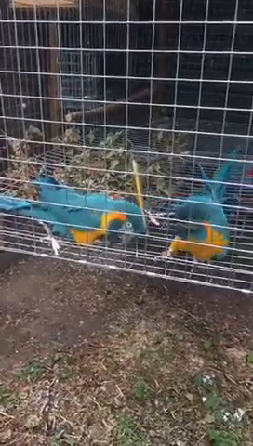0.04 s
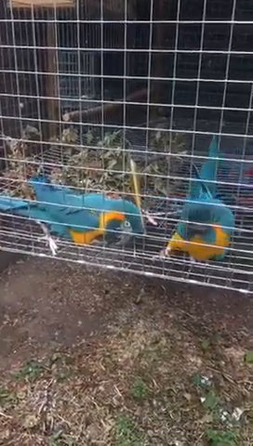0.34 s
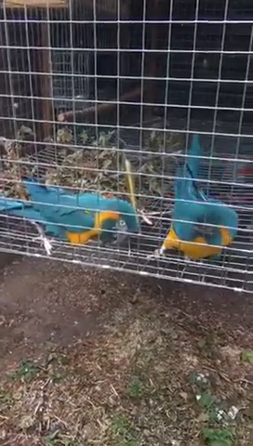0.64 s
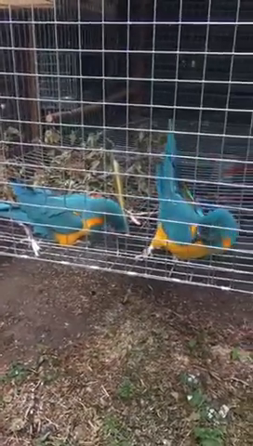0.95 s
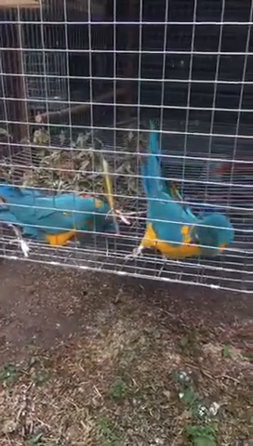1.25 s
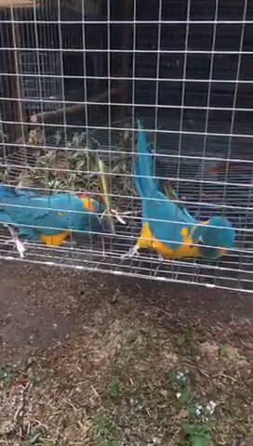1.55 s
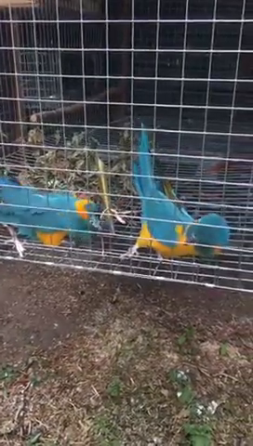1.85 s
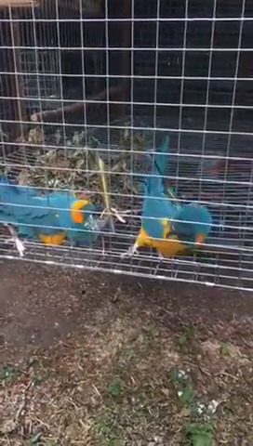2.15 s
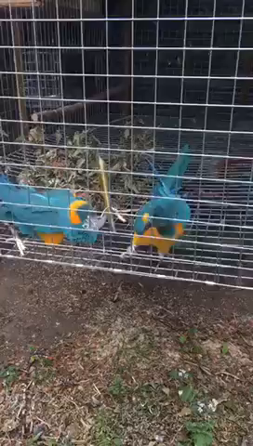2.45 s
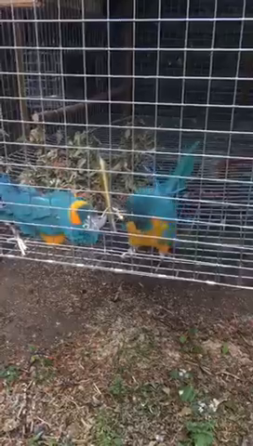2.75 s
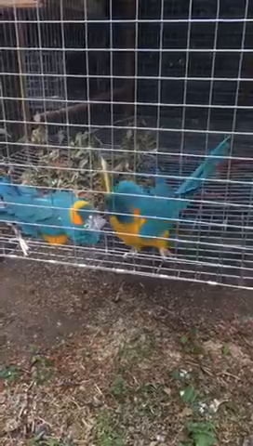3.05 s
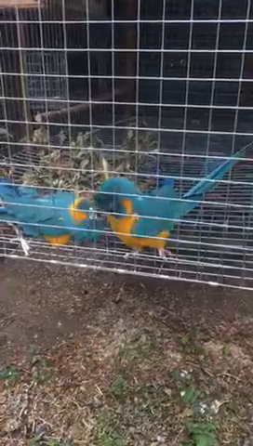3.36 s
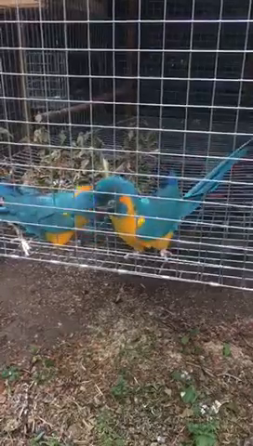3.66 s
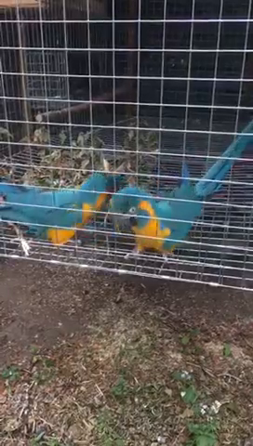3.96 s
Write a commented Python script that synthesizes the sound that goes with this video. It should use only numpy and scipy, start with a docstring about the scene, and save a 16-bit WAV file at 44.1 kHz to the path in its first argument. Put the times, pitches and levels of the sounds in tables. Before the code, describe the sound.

A macaw gives one raspy squawk over steady outdoor hiss and low rumble.

```python
"""A macaw in an outdoor wire cage gives a short low croak, then one raspy squawk that swells and sags.
Its voice is a train of uneven pulses and turbulent air, shaped by the throat and answered by the aviary.
The wire ticks once, feathers brush the mesh and the microphone takes a few soft bumps.
Behind it all sits a bed of steady hiss and low rumble, with a distant bird whistling near the end."""
import sys
import numpy as np
from scipy import signal
from scipy.fft import rfft, irfft, next_fast_len
from scipy.io import wavfile
from scipy.ndimage import map_coordinates

SR = 44100
rng = np.random.default_rng(int(sys.argv[2]) if len(sys.argv) > 2 else 0)


def materialize(psi):
    """Save the field psi as 16-bit PCM at rate SR to the path in sys.argv[1].

    A 1-D psi becomes a single channel; in a 2-D psi each row is a channel.
    """
    bounded = np.clip(np.atleast_2d(psi).T, -1, 1)
    quanta = np.round(bounded * 32767).astype(np.int16)
    wavfile.write(sys.argv[1], SR, quanta)


N = 176400

# EQ of the outdoor hiss and of the air rumble: f/Hz, gain/dB
HISS_EQ = [(120, -31), (200, -1.5), (225, -4), (303, 0), (357, -2.5), (429, -3), (550, -9.5), (660, -15.5),
           (982, -7.5), (1070, -8), (1460, -8), (1670, -10.5), (2250, -11), (4220, -7.5), (4900, -9),
           (6080, -1), (7660, -10.5), (9510, -15.5), (10500, -23), (13600, -46), (22000, -120)]
RUMBLE_EQ = [(10, -22), (22, -3.5), (45, -0.5), (70, -7.5), (100, -16.5), (160, -28), (250, -42),
             (500, -76.5)]
# their fader rides: t/s, level/dB
HISS_RIDE = [(0, -49), (1, -48.5), (2, -47.5), (3, -46), (3.5, -46), (4, -46)]
RUMBLE_RIDE = [(0, -29.5), (.6, -33), (1.2, -34.5), (2, -34.5), (2.8, -35), (3.3, -34.5), (4, -35.5)]
# distant bird, one table per note: t/s, f/Hz, level/dB
WHISTLE_NOTES = [
    [(3.42, 2400, -68), (3.45, 2180, -57), (3.5, 1900, -60), (3.55, 1970, -52), (3.6, 2010, -54),
     (3.675, 1985, -52), (3.69, 1950, -72)],
    [(3.74, 2380, -68), (3.785, 2320, -54), (3.818, 2240, -45), (3.855, 2150, -54), (3.89, 2170, -66)],
    [(3.89, 1560, -66), (3.925, 1600, -56), (3.955, 1650, -53), (3.98, 1650, -68)],
]
# reverb time of the woods and of the aviary: f/Hz, t60/s
WOODS_DECAY = [(200, .2), (2500, 0.26), (10000, 0.11)]
AVIARY_DECAY = [(200, 0.41), (2500, 0.31), (10000, 0.099)]
# microphone bumps: t/s, level/dB, starting f/Hz, t60/s
MIC_BUMPS = [(.055, -32.5, 198, 0.15), (1.371, -20.5, 143, 0.59), (1.492, -22.5, 280, 0.033),
             (1.5, -16, 72.5, 0.086), (2.901, -21.5, 54, 0.3), (3.66, -16, 63, 0.12)]
# tick on the wire and swell of the feather rustle: t/s, level/dB
WIRE_TICKS = [(1.186, -29)]
RUSTLE_RIDE = [(1.18, -61), (1.21, -50.5), (1.255, -52), (1.31, -64)]
# their bright EQs: f/Hz, gain/dB
TICK_EQ = [(1000, -20), (4500, -14), (6000, 0), (7500, -7), (10500, -8)]
RUSTLE_EQ = [(2000, -15), (5000, -8), (6500, 2), (8500, -7), (10500, -4.5)]
# vocal effort of the croak and of the squawk: t/s, level/dB
CROAK_EFFORT = [(.94, -61), (.985, -47), (1.025, -46.5), (1.06, -73)]
SQUAWK_EFFORT = [(2.22, -66), (2.3, -49), (2.37, -41.5), (2.41, -40), (2.45, -34), (2.52, -30.5),
                 (2.585, -30), (2.635, -34.5), (2.7, -41), (2.735, -55.5), (2.78, -62)]
# pitch arc of the squawk: t/s, f/Hz
SQUAWK_PITCH = [(2.25, 368), (2.34, 376), (2.38, 390), (2.42, 436), (2.465, 422), (2.51, 425), (2.538, 441),
                (2.572, 423), (2.6, 398), (2.635, 376), (2.76, 362)]
# rasp of the squawk: t/s, share of turbulent air/0-1
SQUAWK_RASP = [(2.3, .35), (2.435, .55), (2.49, .16), (2.56, .14), (2.61, .42), (2.72, .42)]
# tone of the croak, the breath, the nearly shut beak and the open beak: f/Hz, gain/dB
CROAK_EQ = [(300, -22), (600, -13), (850, -1), (1150, -0.5), (1600, -1), (2200, -12), (2900, -12),
            (3200, 7), (3450, -7), (4000, 2.5), (4500, -5), (5500, -4), (7000, -20), (10000, -36)]
BREATH_EQ = [(400, -13), (1200, -1), (2400, -1), (7000, -0.5)]
BEAK_SHUT_EQ = [(300, -26), (700, -20), (1000, -3), (1180, -0.5), (1600, -14), (2200, -4), (2550, -2.5),
                (3200, -20), (3700, 0), (4300, 3), (5100, -7), (5900, 4.5), (7200, -8), (10000, -20.5)]
BEAK_OPEN_EQ = [(200, -22.5), (420, -13), (630, -24), (860, -14), (1250, -15.5), (1850, -18), (2120, -7.5),
                (3400, -4.5), (3900, -7.5), (5100, -7.5), (6400, -2.5), (7100, -10.5), (7900, -11),
                (8600, -20.5), (9600, -15.5), (11000, -46.5)]
# resonances of the open throat: f/Hz, width/Hz, boost/dB
THROAT_FORMANTS = [(1270, 170, 6), (2550, 270, 11), (3230, 360, 8), (4500, 380, 10), (5980, 380, 8)]


def amp(db):
    """Decibels to gain."""
    return 10 ** (np.asarray(db) / 20)


def unit(x):
    """Normalise to rms 1."""
    return x / np.sqrt(np.mean(x ** 2) + 1e-20)


def along(points, hz):
    """Read (f/Hz, value) points on a log frequency axis."""
    f, values = np.transpose(points)
    return np.interp(np.log(hz + 1), np.log(f + 1), values)


def curve(rows, column=1):
    """One column of a time table as an automation lane."""
    rows = np.array(rows)
    return np.interp(np.arange(N) / SR, rows[:, 0], rows[:, column])


def envelope(rows, column=1):
    """Gain from a dB column, muted outside its span."""
    t = np.arange(N) / SR
    return amp(curve(rows, column)) * (t > rows[0][0]) * (t < rows[-1][0])


def wobble(rate):
    """A smooth random LFO, rate points a second."""
    points = rng.standard_normal(int(N * rate / SR) + 4)
    return map_coordinates(points, [np.arange(N) * rate / SR])


def filtered(x, response):
    """Zero-phase filter; response gives the gain at each frequency."""
    size = next_fast_len(N + SR // 2)
    return irfft(rfft(x, size) * response(np.fft.rfftfreq(size, 1 / SR)), size)[:N]


def eq(x, points, peaks=(), size=4096):
    """Minimum-phase EQ: a drawn curve with resonant peaks on top."""
    f = np.fft.rfftfreq(size, 1 / SR)
    peaks_db = sum(boost / (1 + (2 * (f - hz) / width) ** 2) for hz, width, boost in peaks)
    cepstrum = irfft(np.log(amp(along(points, f) + peaks_db)))
    cepstrum[1:size // 2] *= 2  # folded so nothing rings ahead of a transient
    cepstrum[size // 2 + 1:] = 0
    return signal.fftconvolve(x, irfft(np.exp(rfft(cepstrum))))[:N]


def reverb(x, decay):
    """A diffuse tail in which each frequency dies at its own speed."""
    hz, t, noise = signal.stft(rng.standard_normal(SR // 2), SR, nperseg=256)
    fall_db = -60 * t / along(decay, hz)[:, None]
    tail = signal.istft(noise * amp(fall_db), SR, nperseg=256)[1]
    return signal.fftconvolve(x, tail / np.linalg.norm(tail))[:N]


def outdoor_bed(lumps_db=1.5, drift_db=.53):
    """Steady outdoor hiss over a lumpy rumble of air on the microphone."""
    hiss = unit(filtered(rng.standard_normal(N), lambda hz: amp(along(HISS_EQ, hz))))
    rumble = filtered(rng.standard_normal(N), lambda hz: amp(along(RUMBLE_EQ, hz)))
    rumble = unit(rumble * amp(lumps_db * wobble(6.996)))
    return hiss * amp(curve(HISS_RIDE) + drift_db * wobble(8)) + rumble * amp(curve(RUMBLE_RIDE))


def distant_bird(waver=.016, wet_db=-4):
    """Three wavering whistles, blurred by the woods."""
    song = np.zeros(N)
    for note in WHISTLE_NOTES:
        pitch = curve(note) * (1 + waver * wobble(150))
        song += envelope(note, column=2) * np.sin(2 * np.pi * np.cumsum(pitch) / SR)
    return song + amp(wet_db) * reverb(song, WOODS_DECAY)


def mic_bumps(rest_hz=45.4, sag_s=.014, attack_s=.0043):
    """Soft thumps on the microphone, each a sine diving in pitch."""
    thumps = np.zeros(N)
    for start, db, hz, t60 in MIC_BUMPS:
        t = np.arange(N - round(start * SR)) / SR
        pitch = rest_hz + (hz - rest_hz) * np.exp(-t / sag_s)
        gain = amp(db - 60 * t / t60) * (1 - np.exp(-t / attack_s))
        thumps[-len(t):] += gain * np.sin(2 * np.pi * np.cumsum(pitch) / SR)
    return thumps


def wire_tick(t60_s=.008):
    """A claw or beak hits the mesh: a tight, bright noise burst."""
    gain = np.zeros(N)
    for start, db in WIRE_TICKS:
        t = np.arange(N - round(start * SR)) / SR
        gain[-len(t):] += amp(db - 60 * t / t60_s)
    return gain * unit(eq(rng.standard_normal(N), TICK_EQ))


def feather_rustle(flutter_db=1.7):
    """Feathers brush along the mesh: airy, fluttering noise."""
    brush = unit(eq(rng.standard_normal(N), RUSTLE_EQ))
    return envelope(RUSTLE_RIDE) * brush * amp(flutter_db * wobble(150))


def early_reflections(x, count=40, spread_s=.012, depth_db=-4):
    """The walls smear each pulse in time; only phase moves, so the tone holds."""
    delays = (SR * spread_s * rng.random(count)).astype(int)
    taps = np.bincount(delays, rng.choice([-1, 1], count)) / np.sqrt(count)
    size = next_fast_len(N + SR // 2)
    phase = np.angle(1 + amp(depth_db) * rfft(taps, size))
    return irfft(rfft(x, size) * np.exp(1j * phase), size)[:N]


def voice_pulses(cycles, limp_s, jitter_s, scatter_db):
    """One pulse per cycle, alternately early and late by limp_s, uneven in time and size."""
    k = np.arange(1, int(cycles[-1]))
    timing, strength = rng.standard_normal((len(k), 2)).T
    centres = np.interp(k, cycles, np.arange(N)) + SR * (limp_s * (-1) ** k + jitter_s * timing)
    taps = np.floor(centres).astype(int)[:, None] + np.arange(-7, 9)
    offset = taps - centres[:, None]
    clicks = np.sinc(offset) * np.cos(np.pi * offset / 16) ** 2  # band-limited
    clicks *= amp(scatter_db * strength[:, None])
    return unit(np.bincount(np.clip(taps, 0, N - 1).ravel(), clicks.ravel(), N))


def macaw_croak(pitch_hz=112.4, waver=.073, breath_gain=.93):
    """Slow, loose pulses and almost as much air, shaped by the throat."""
    cycles = np.cumsum(pitch_hz * (1 + waver * wobble(40))) / SR
    rattle = voice_pulses(cycles, limp_s=0, jitter_s=.000562, scatter_db=3)
    source = rattle + breath_gain * rng.standard_normal(N)
    return envelope(CROAK_EFFORT) * unit(eq(source, CROAK_EQ))


def macaw_squawk(waver=.04, flutter_db=.4, open_at_s=2.375, open_takes_s=.043):
    """Limping pulses and puffs of air ring the throat; the tone crossfades as the beak opens."""
    rasp = curve(SQUAWK_RASP)
    cycles = np.cumsum(curve(SQUAWK_PITCH) * (1 + waver * rasp * wobble(130))) / SR
    puffs = rng.standard_normal(N) * (1 + .56 * np.cos(2 * np.pi * cycles))
    breath = unit(eq(puffs, BREATH_EQ))
    buzz = voice_pulses(cycles, limp_s=.000034, jitter_s=.000016, scatter_db=1.6)
    source = np.sqrt(1 - rasp) * buzz + np.sqrt(rasp) * breath
    source *= amp(flutter_db * wobble(140))
    beak_shut = unit(eq(source, BEAK_SHUT_EQ))
    beak_open = unit(eq(source, BEAK_OPEN_EQ, THROAT_FORMANTS))
    gape = np.clip((np.arange(N) / SR - open_at_s) / open_takes_s, 0, 1)
    return envelope(SQUAWK_EFFORT) * ((1 - gape) * beak_shut + gape * beak_open)


def scene(aviary_wet_db=-5):
    """Mono mix: the cage bus with its aviary reverb, over the surroundings."""
    cage = early_reflections(macaw_squawk()) + macaw_croak() + wire_tick() + feather_rustle()
    cage += amp(aviary_wet_db) * reverb(cage, AVIARY_DECAY)
    return (cage + distant_bird() + mic_bumps() + outdoor_bed())[None]


def record(dry, fade_s=.004, high_cut_hz=10500):
    """Master: a quick fade at each end and a brick-wall high cut."""
    t = np.arange(N) / SR
    fade = np.clip(np.minimum(t, t[::-1]) / fade_s, 0, 1)
    return filtered(dry[0] * fade, lambda hz: hz < high_cut_hz)[None]


dry = scene()
out = record(dry)
materialize(out)
```